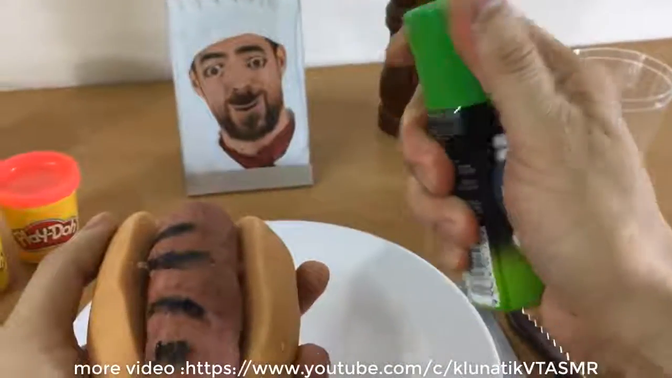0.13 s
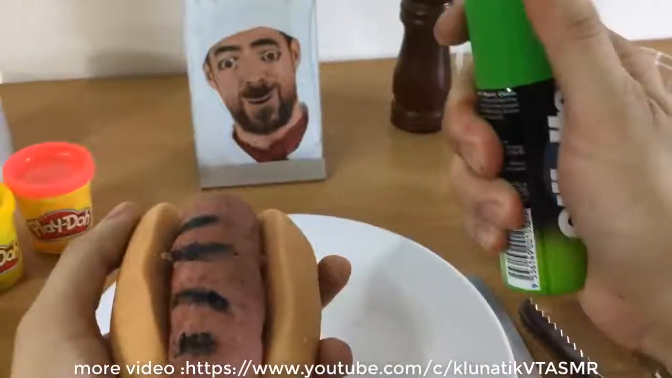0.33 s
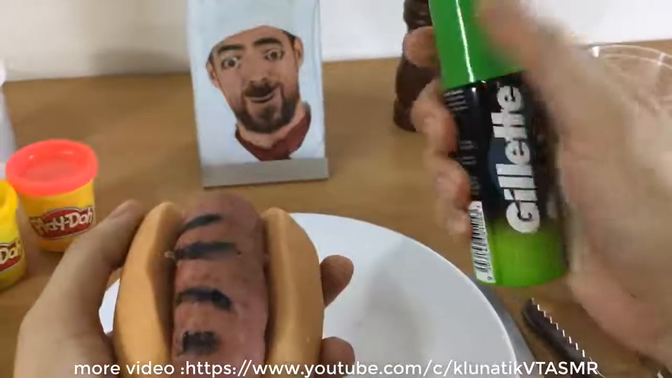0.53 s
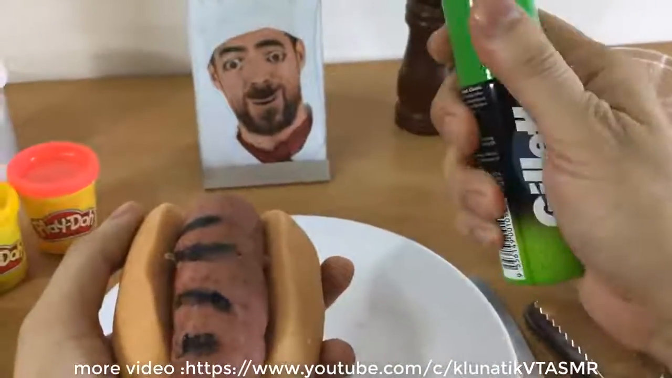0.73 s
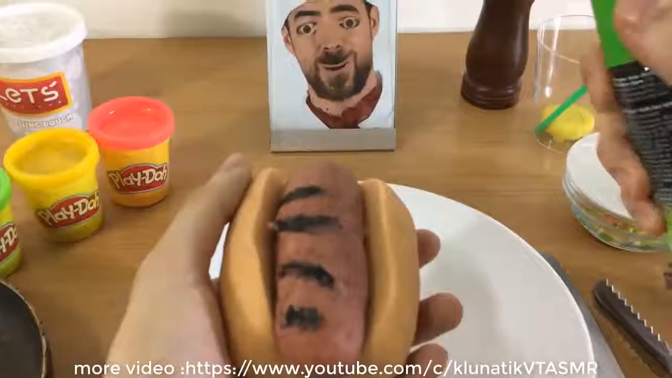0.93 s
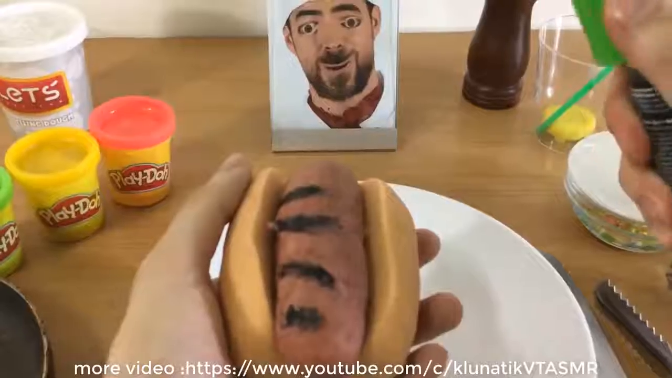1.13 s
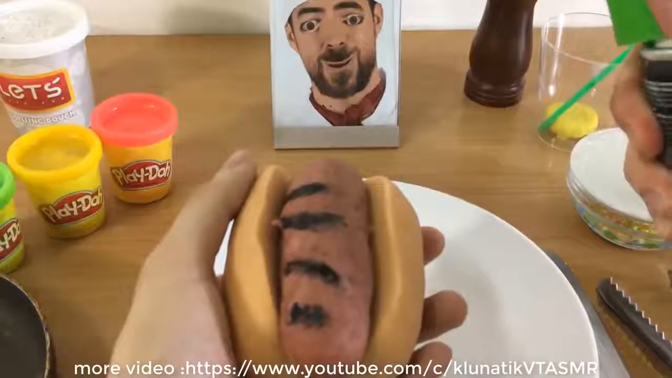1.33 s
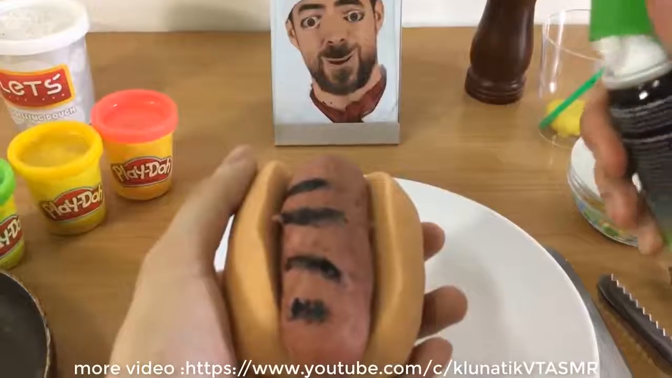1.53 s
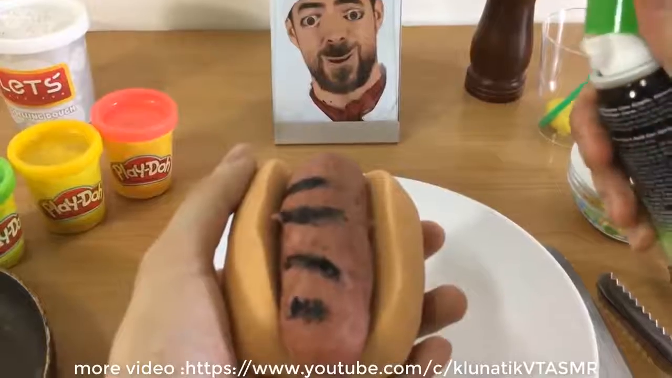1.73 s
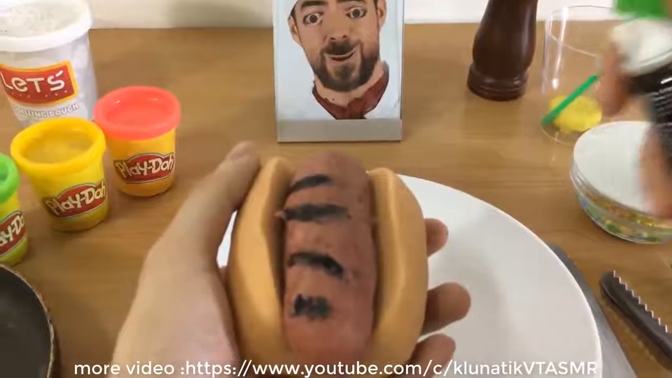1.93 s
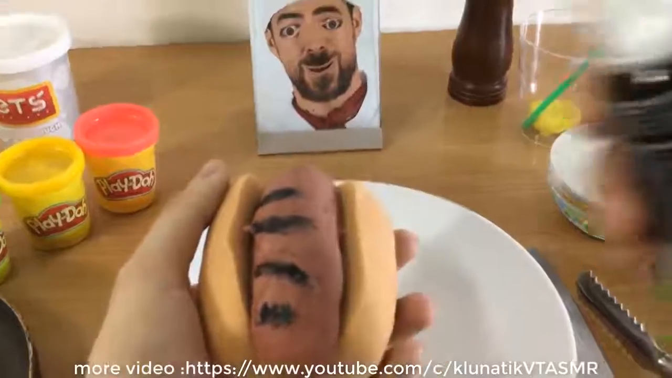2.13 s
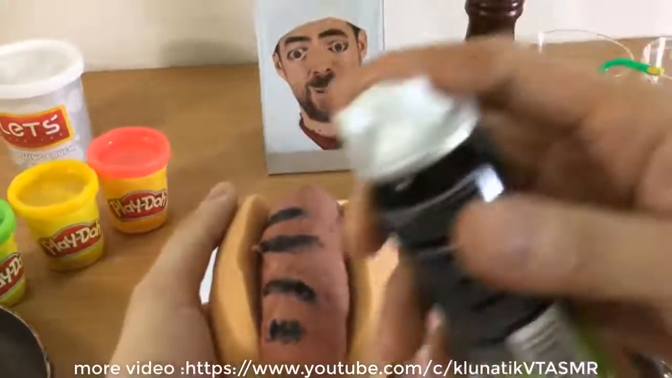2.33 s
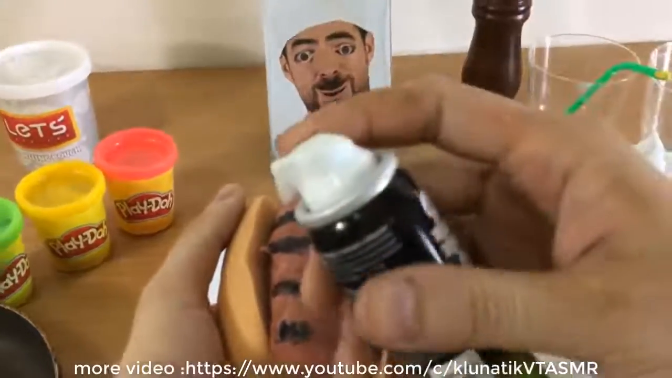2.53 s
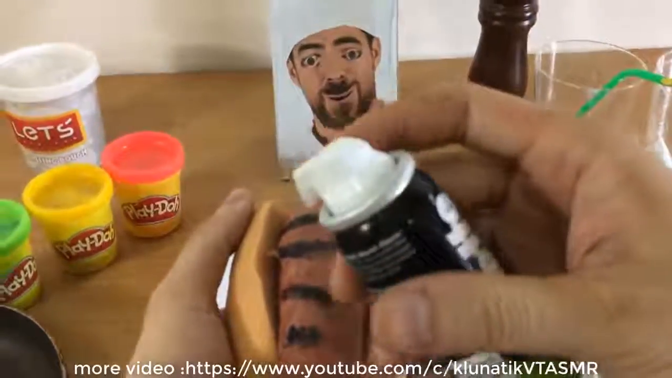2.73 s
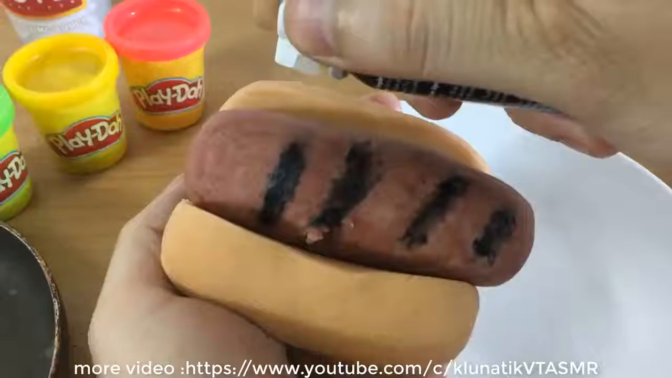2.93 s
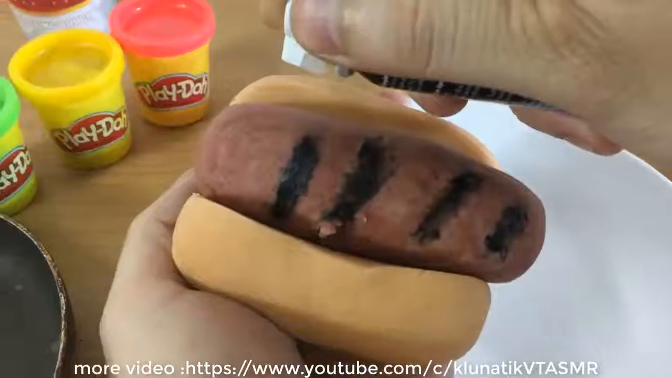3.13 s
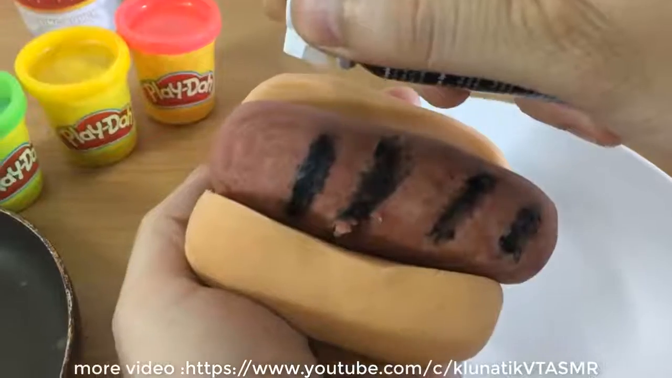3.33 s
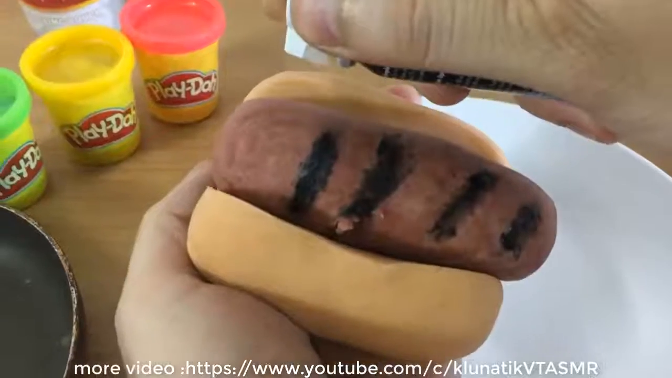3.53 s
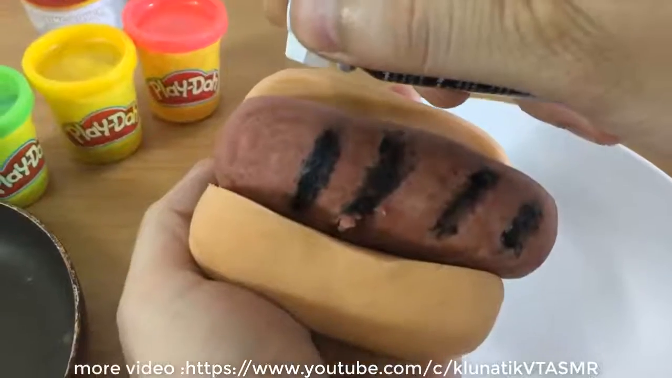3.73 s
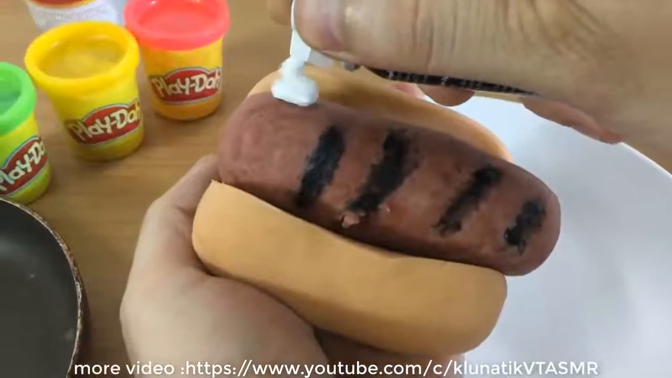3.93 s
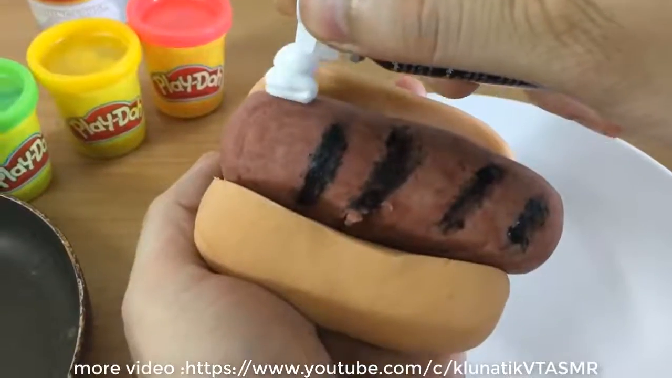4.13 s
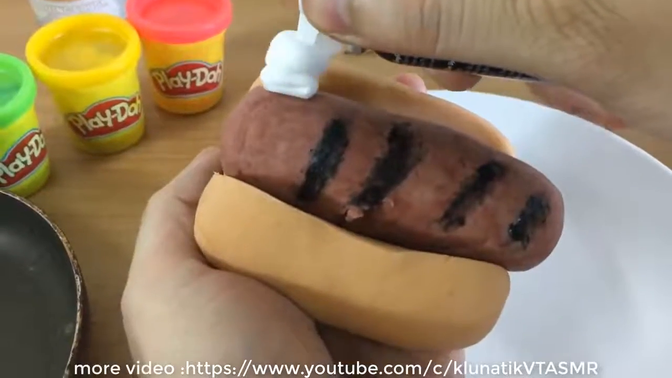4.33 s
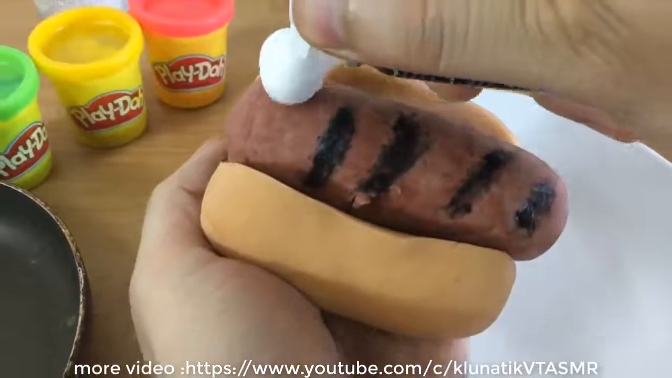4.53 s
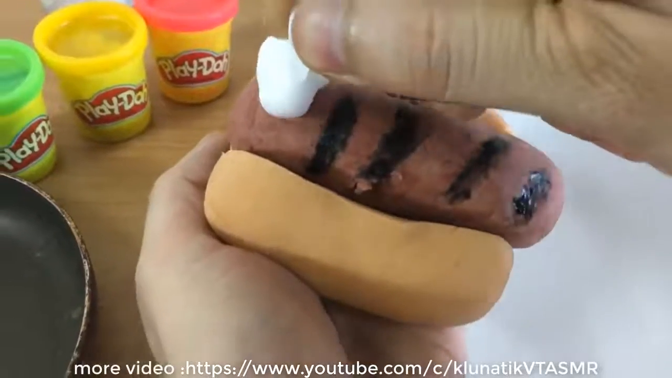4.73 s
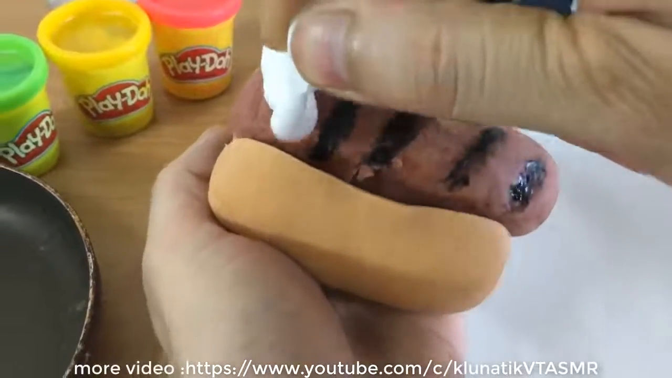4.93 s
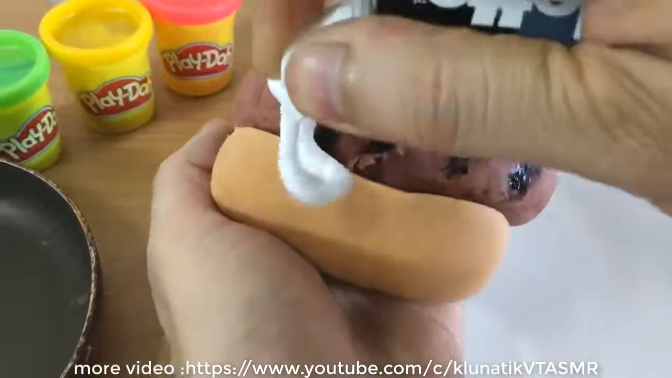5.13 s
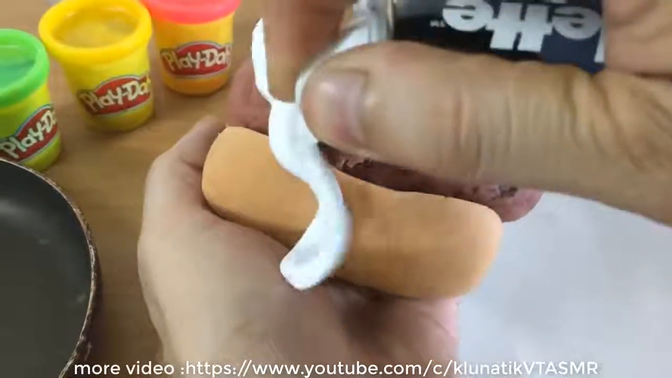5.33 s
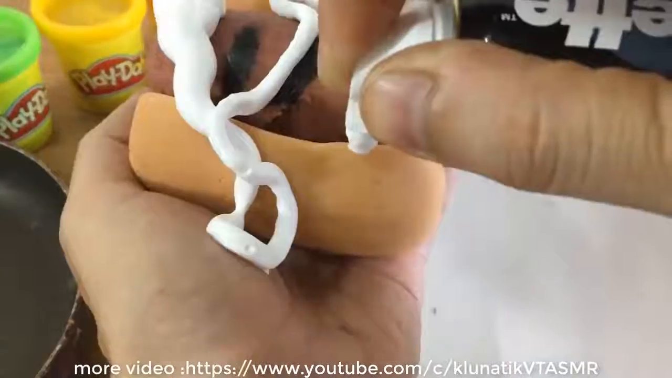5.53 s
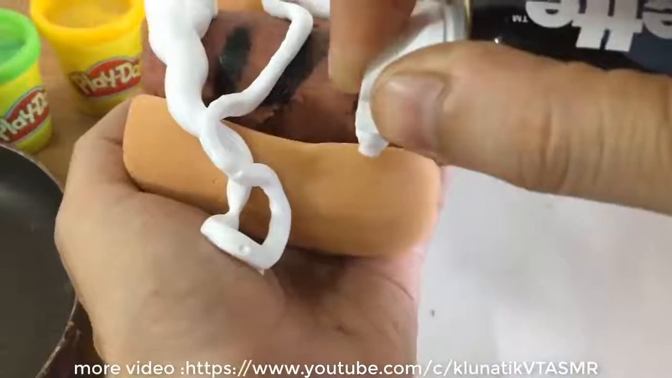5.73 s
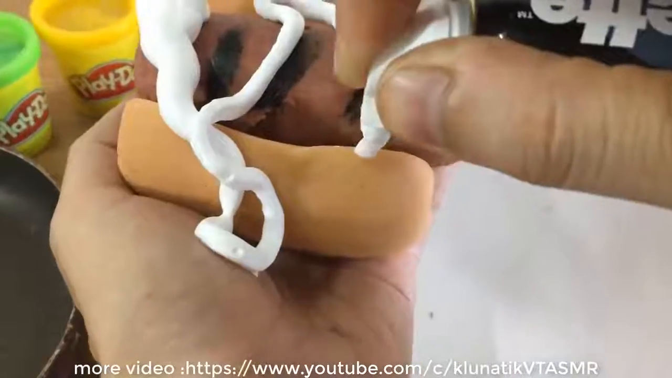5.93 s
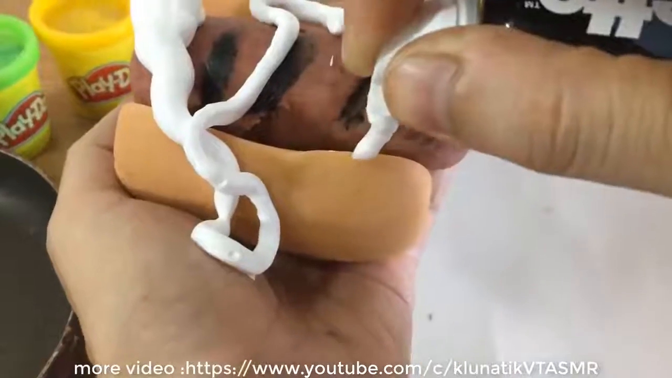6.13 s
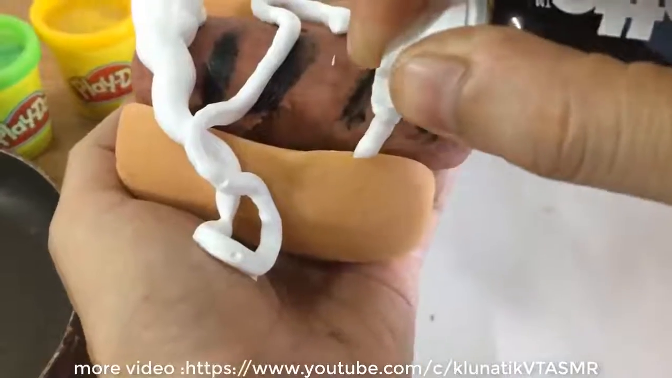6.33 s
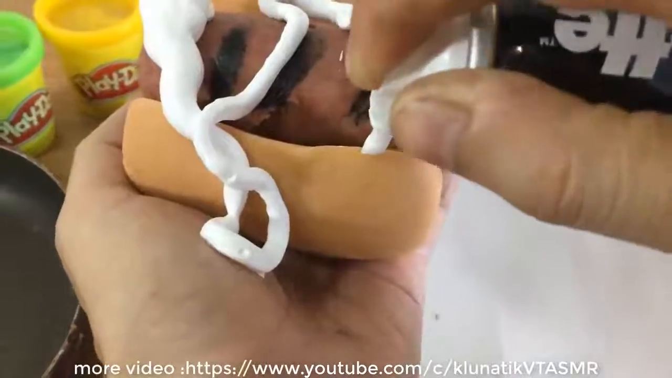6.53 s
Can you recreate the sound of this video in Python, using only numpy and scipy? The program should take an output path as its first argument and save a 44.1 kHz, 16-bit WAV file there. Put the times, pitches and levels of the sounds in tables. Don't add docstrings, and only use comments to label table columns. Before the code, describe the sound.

Close up in a quiet, bare-walled room, fingers creak and rub faintly on a metal can. A plastic cap cracks, then pops off very loudly with a hollow knock and brief echo. After a quiet pause of small handling ticks, a valve opens: thin gas hiss with spitting droplets and a few wet pops. The hiss swells, then is smothered into a dull, irregular gurgling crackle. Low room rumble sits underneath.

```python
import sys
import numpy as np
from scipy import signal
from scipy.fft import rfft, irfft, next_fast_len
from scipy.io import wavfile
from scipy.ndimage import map_coordinates

SR = 44100
rng = np.random.default_rng(int(sys.argv[2]) if len(sys.argv) > 2 else 0)


def boost(x):
    u = np.asarray(x, float) / 20
    return 10 ** u


def file_out(sig):
    cols = np.atleast_2d(sig).T
    lim = np.clip(cols, -1, 1)
    pcm = np.round(lim * 32767).astype(np.int16)
    wavfile.write(sys.argv[1], SR, pcm)


N = 290178
COVERED_S = 5.621


def unit(x):
    return x / np.sqrt(np.mean(x ** 2) + 1e-20)


def along(points, hz):
    f, value = np.transpose(points)
    return np.interp(np.log(hz + 1), np.log(f + 1), value)


def colour(points):
    return lambda hz: boost(along(points, hz))


def levels(rows):
    s, *columns = np.transpose(rows)
    t = np.arange(N) / SR
    return [boost(np.interp(t, s, db, -120, -120)) for db in columns]


def wobble(rate):
    knots = rng.standard_normal(int(N * rate / SR) + 4)
    return map_coordinates(knots, [np.arange(N) * rate / SR])


def resonances(modes, f):
    total = 0
    for k, (centre, width, db) in enumerate(modes):
        damping = 1j * f * width
        total = total + (-1) ** k * boost(db) * damping / (centre * centre - f * f + damping)
    return total


def filtered(x, response):
    n = x.shape[-1]
    m = next_fast_len(n + 2048)
    hz = np.fft.rfftfreq(m, 1 / SR)
    return irfft(rfft(x, m) * response(hz), m)[..., :n]


def spread(pair, alike):
    def mid_side_gains(hz):
        turn = np.arccos(np.clip(along(alike, hz), -1, 1)) / 2
        return np.array([np.cos(turn), np.sin(turn)])
    mid, side = filtered(pair, mid_side_gains)
    return np.array([mid + side, mid - side])


def rush(gain, alike, grain_db, rate):
    lumps = boost(grain_db * wobble(rate))
    noise = lumps * rng.standard_normal((2, N))
    return unit(filtered(spread(noise, alike), gain))


def panned(x, pan_db):
    return x * boost(np.array([[.5], [-.5]]) * pan_db)


def snaps(rows, body, ring_q, rise, differ, pan_db, kick, bubble_db):
    out, t = np.zeros((2, N + 2048)), np.arange(2048) / SR
    climb_s = 0.00597
    for s, db, hz, t60, ring_db in rows:
        draw = rng.standard_normal((4, len(t)))
        spikes = (draw[0] + differ * draw[1:3]) * np.exp(0.5 * draw[3])
        fade = boost(-60 * t / np.clip(t60, .003, .05)) * (1 - np.exp(-t / rise))
        burst = spikes * fade
        burst[:, 1 + round(rise * SR)] += kick
        ring = [(hz, hz / ring_q, 0)]
        sound = filtered(burst, lambda f: body(f) + boost(ring_db) * resonances(ring, f) ** 2)
        tone = np.sin(2 * np.pi * hz * t * (1 + t / climb_s / 2))
        bubble = boost(bubble_db + 2.7 * draw[3, 0]) * fade * tone
        peak = np.abs(sound.mean(0)).max()
        out[:, round(s * SR):][:, :len(t)] += boost(db) * (sound / peak + bubble)
    return panned(out[:, :N], pan_db)


# start_s, gas_flow_db, liquid_load_db in the stem
JET_FLOW = [(3.62, -73, -1), (3.702, -67, 3), (3.772, -61.5, 3), (3.862, -59.5, 4.5), (3.94, -55, 5.5),
            (4.04, -59, 6.5), (4.1, -63.5, 0), (4.332, -66.5, 1), (4.55, -65.5, -1), (4.766, -65.5, 0),
            (4.936, -62.5, -5), (5.2, -63.5, -4.5), (5.408, -52.5, -7.5), (5.488, -49.5, -6.5),
            (5.66, -50, -4.5)]
# peak_s, level_db, rise_db_per_s, fall_db_per_s
THROAT_CHOKES = [
    (4.045, -64, 118, 200),
    (5.619, -51, 76, 900),
]
# pitch_hz, level_db per Hz
THROAT_COLOUR = [(400, -120), (700, -4.5), (1000, 2.5), (1500, -8), (2100, -5.5), (3200, -120)]
# pitch_hz, level_db per Hz
STEM_COLOUR = [(1100, -120), (1700, -8), (2500, 3), (3050, -8), (4100, -11.5), (5000, -5), (6500, -7),
               (8000, -13), (10000, -120)]
# pitch_hz, width_hz, level_db
STEM_MODES = [(3000, 180, 6), (3950, 380, 7), (4980, 200, 3)]
# pitch_hz, level_db per Hz
FIZZ_COLOUR = [(3500, -120), (5500, -14.5), (7500, -4), (8800, -3), (11000, -4.5), (13000, -6.5),
               (15500, -18), (17000, -120)]
# pitch_hz, width_hz, level_db
NOZZLE_MODES = [(5150, 110, -2.5), (5900, 250, -0.5), (6960, 300, -4), (8480, 410, -2.5), (9860, 220, -2),
                (10970, 350, -4), (13000, 900, -14)]
# pitch_hz, likeness (-1 to 1)
NEAR_ALIKE = [(60, 0.15), (130, -0.017), (290, 0.63), (640, 1), (1410, 0.67), (3100, 0.84), (6820, -0.47),
              (15000, -0.1)]
# start_s, peak_db, pitch_hz
FIRST_DROPLETS = [(3.9973, -40, 5030), (4.0134, -33, 4430), (4.025, -38, 9700), (4.031, -33, 4740),
                  (4.742, -42, 9450)]
# start_s, peak_db, pitch_hz
DROPLETS = [(4.1387, -47, 9600), (4.1718, -52, 4630), (4.2069, -48, 9860), (4.2274, -47, 9840),
            (4.2625, -47, 9910), (4.2828, -46, 4690), (4.2907, -43, 4690), (4.3025, -44, 9500),
            (4.3119, -46, 8570), (4.3276, -47, 9880), (4.3366, -48, 5900), (4.3612, -49, 5120),
            (4.3845, -51, 9600), (4.4137, -32.5, 10140), (4.4375, -43, 9910), (4.4505, -47, 4930),
            (4.4686, -54, 4970), (4.4783, -54, 9600), (4.5093, -51, 5040), (4.5372, -36, 6100),
            (4.5608, -42, 4640), (4.5875, -42, 7110), (4.6078, -52, 9260), (4.6196, -53, 5960),
            (4.6526, -52, 9670), (4.6788, -40, 5000), (4.6927, -38, 9910), (4.7133, -35.5, 5980),
            (4.7374, -40, 9470), (4.7536, -43, 8180), (4.7617, -40, 6030), (4.7705, -45, 5150),
            (4.7948, -44, 9450), (4.8036, -38, 5170), (4.8339, -44, 5800), (4.8441, -33, 5900),
            (4.8741, -38, 7600), (4.8815, -42, 5170), (4.8877, -45, 5100), (4.9038, -36, 9350),
            (4.912, -42, 5250), (4.9231, -39, 5120), (4.94, -42, 4720), (4.9736, -40, 5100),
            (4.9849, -42, 5150), (4.9979, -37, 5200), (5.0098, -38, 4950), (5.0243, -36, 5100),
            (5.0467, -46, 4950), (5.0578, -45, 9910), (5.0963, -44, 5000), (5.1256, -34.5, 5180),
            (5.1442, -44, 5860), (5.2146, -43, 5900), (5.2208, -44, 6750), (5.2706, -45, 6560)]
# pitch_hz, level_db
SPLASH_COLOUR = [(3200, -60), (4600, -1), (9000, -3.5), (13500, -9), (15500, -22), (17000, -60)]


def jet():
    fizz, load = levels(JET_FLOW)
    t = np.arange(N) / SR
    fizz = fizz * (t < COVERED_S)
    flow = fizz / boost(-60)
    choke = 0
    for s, db, rise, fall in THROAT_CHOKES:
        choke = choke + boost(db - np.where(t < s, rise * (s - t), fall * (t - s)))
    throat = (fizz > 1e-5) * (choke + boost(-65) * flow ** 0.072)
    whistle = boost(-60) * flow ** 0.93

    nozzle = lambda f: resonances(NOZZLE_MODES, f)
    stem = lambda f: colour(STEM_COLOUR)(f) * (1 + np.abs(resonances(STEM_MODES, f)) ** 2)
    hiss = throat * rush(colour(THROAT_COLOUR), NEAR_ALIKE, grain_db=4.0, rate=56)
    hiss += fizz * load * rush(stem, NEAR_ALIKE, grain_db=1.2, rate=90)
    hiss += fizz * rush(colour(FIZZ_COLOUR), NEAR_ALIKE, grain_db=1.0, rate=150)
    hiss += whistle * rush(nozzle, NEAR_ALIKE, grain_db=3, rate=170)

    t60_s, ring_db, lead_s, trim_db = 0.013, 6.5, .0008, -1
    droplets = list(FIRST_DROPLETS) + list(DROPLETS)
    rows = [(s - lead_s, db + trim_db, hz, t60_s, ring_db) for s, db, hz in droplets]
    spray = lambda f: nozzle(f) + colour(SPLASH_COLOUR)(f)
    return hiss + snaps(rows, spray, ring_q=9.7, rise=0.0012, differ=1.0, pan_db=-5.5, kick=1.4,
                        bubble_db=-120)


# start_s, peak_db, pitch_hz, t60_s, ring_db
FOAM_POPS = [(3.996, -35.5, 3670, 0.054, 11), (4.014, -31.5, 4100, 0.02, 4), (4.039, -32, 1010, 0.021, 11),
             (4.048, -35, 1090, 0.013, 5), (4.058, -40, 1110, 0.014, 1), (4.398, -39, 1000, 0.012, 12),
             (4.7612, -33.5, 1250, 0.006, 11), (4.7616, -29, 2060, 0.0087, 10),
             (4.9045, -28, 1017, 0.068, 2), (4.9118, -17, 780, 0.0088, 4), (4.9128, -25.5, 2075, 0.034, 12),
             (6.0135, -26, 4650, 0.018, 11), (6.0215, -31.5, 2930, 0.012, -1),
             (6.157, -26.5, 4100, 0.015, 4), (6.2225, -23, 1470, .015, 2), (6.2483, -24, 3000, 0.027, -13),
             (5.121, -35.5, 2370, 0.065, 4.5)]
# start_s, peak_db, pitch_hz
BLANKET_BURSTS = [(5.6241, -29.5, 1400), (5.6483, -40, 5150), (5.6576, -48, 6420), (5.6712, -33, 2600),
                  (5.6963, -43, 5340), (5.7075, -29, 1790), (5.7209, -39, 2450), (5.7485, -31, 2400),
                  (5.7753, -19, 1506), (5.796, -39, 1520), (5.8116, -39, 2540), (5.8312, -38.5, 3660),
                  (5.858, -21, 1524), (5.8681, -30, 3340), (5.8892, -43, 3740), (5.8955, -38, 1320),
                  (5.9185, -31, 920), (5.9552, -36, 4350), (5.967, -37, 1170), (5.975, -36, 4300),
                  (5.9842, -37, 1770), (5.9915, -33.5, 3020), (6.017, -25.5, 2300), (6.0397, -27, 1550),
                  (6.0472, -35, 2970), (6.0705, -31, 1780), (6.0798, -47, 2200), (6.093, -27, 1490),
                  (6.11, -34, 1810), (6.117, -33, 3010), (6.1265, -34, 1380), (6.161, -22.5, 900),
                  (6.1706, -23, 3860), (6.1789, -30, 5240), (6.221, -16.5, 1760), (6.2306, -24, 3080),
                  (6.2372, -25.5, 2930), (6.2441, -18.5, 1510), (6.271, -30, 2050), (6.2812, -25, 1680),
                  (6.288, -30, 1160), (6.3041, -29, 2220), (6.313, -33, 2890), (6.318, -28, 1400),
                  (6.336, -34, 1280), (6.3575, -35, 3010), (6.3767, -29, 1500), (6.3808, -29, 1010),
                  (6.3888, -27, 1820), (6.4056, -29, 1810), (6.414, -24, 3000), (6.42, -19.5, 1520),
                  (6.4312, -22, 1690), (6.4592, -29, 3030), (6.4675, -21.5, 1330), (6.4843, -30, 910),
                  (6.497, -27, 2200), (6.5272, -23, 1370), (6.5588, -40, 1280), (6.566, -34, 1440)]
# start_s, gurgle_db
GURGLE = [(5.62, -52), (5.72, -49), (5.8, -46.5), (5.95, -47.5), (6.07, -39.5), (6.14, -45.5), (6.17, -36),
          (6.2, -39), (6.245, -32), (6.3, -47.5), (6.35, -41), (6.45, -37.5), (6.58, -50.5)]
# pitch_hz, level_db per Hz
FOAM_COLOUR = [(350, -31), (600, -18), (831, -7.5), (1170, -0.5), (1870, 1.5), (2830, -1), (3050, 3),
               (4040, -13.5), (5130, 1), (5720, -24), (7020, -4), (8000, -27), (10400, -55), (17600, -120)]


def foam():
    gurgle, = levels(GURGLE)
    clumps = boost(3.5 * wobble(45) - 7)
    bed = gurgle * clumps * rush(colour(FOAM_COLOUR), NEAR_ALIKE, grain_db=5, rate=700)

    since = np.arange(N) / SR - COVERED_S
    leak = (since > 0) * boost(-56 + 9.5 * np.exp(-np.abs(since) / 0.072))
    leak_modes = [(6380, 710, 8.1), (4500, 980, 6)]
    leak_colour = lambda f: colour(FIZZ_COLOUR)(f) + resonances(leak_modes, f)
    bed += leak * rush(leak_colour, NEAR_ALIKE, grain_db=3.0, rate=34)

    t60_s, ring_db, trim_db = 0.03, 1, -1
    rows = list(FOAM_POPS) + [(s, db + trim_db, hz, t60_s, ring_db) for s, db, hz in BLANKET_BURSTS]
    blanket_modes = [(900, 510, 2.5), (1850, 2400, 2), (2780, 2260, 3.5), (5000, 5400, -6.5)]
    bursts = snaps(rows, lambda f: resonances(blanket_modes, f), ring_q=2.53, rise=0.00015, differ=1.0,
                   pan_db=-5.0, kick=-24, bubble_db=-12)
    muffled = filtered(bursts, lambda f: 1 / (1 + 1j * f / 6800 / 0.83 - (f / 6800) ** 2) ** 3)
    return bed * boost([[-1.8], [1.8]]) + muffled


# start_s, crack_db, thump_db, lip_ring_db, left_right_db, missing_middle (share, 0-1)
CAP_BREAKS = [
    (1.241, -14, -32, -37, -3, .8),
    (1.241, -19.5, -7.5, 0, -2, 1),
    (1.3894, -33.5, -25.5, -16, 6.5, .1),
    (1.3909, -1.5, 6, 7.5, -6.5, 0),
    (1.3951, -17.5, -9.5, -1, 4, .1),
]
# pitch_hz, width_hz, level_db
CAP_CAVITY = [(110, 75, -18.5), (381, 174, 1), (455, 230, 2.5), (1000, 210, 1.5), (1800, 220, -8.5),
              (2720, 640, -4), (5210, 3200, -1.5), (7600, 3500, -2.5), (11400, 3900, -10)]
# pitch_hz, width_hz, level_db
RIM_DIP = (3200, 2400, 0)
# pitch_hz, level_db per Hz
CAP_TO_WALLS = [(70, -26.5), (130, -12), (170, -10), (213, -3.5), (340, -1.5), (374, -6.5), (477, -4),
                (681, -11.5), (836, -17.5), (1000, -8.5), (1250, -14), (1910, -17.5), (2990, -19.5),
                (5150, -23.5), (15000, -35)]


def cap():
    out, blows, t = np.zeros((2, N)), np.zeros(N), np.arange(1024) / SR
    for s, crack_db, thump_db, lip_db, pan_db, miss in CAP_BREAKS:
        draw = rng.standard_normal((3, len(t)))
        crack = (draw[0] + 0.61 * draw[1:]) * boost(crack_db - 60 * t / 0.021) * (1 - np.exp(-t / 0.001))
        crack = filtered(crack, lambda f: 1 - np.clip(miss, 0, 1) * resonances([RIM_DIP], f))
        u = np.clip(t - np.array([[0], [.0003]]), 0, 1) / 0.00034
        push = boost(thump_db) * u * np.exp(1 - u)
        lip = boost(lip_db - 60 * t / 0.003) * np.sin(2 * np.pi * 1800 * t) * (1 - np.exp(-t / 0.00032))
        start = round(s * SR)
        out[:, start:][:, :len(t)] += panned(crack + push + lip, pan_db)
        blows[start] = boost(21.5 + 1.205 * thump_db)
    direct = filtered(out, lambda f: resonances(CAP_CAVITY, f))
    return direct, filtered(blows, colour(CAP_TO_WALLS))


# start_s, peak_db, pitch_hz, t60_s, ring_db
CREAKS = [(.2473, -53, 4000, .01, 2), (.2608, -42.5, 2950, 0.015, 21), (.2724, -47, 4200, .01, -2),
          (.349, -49, 6000, 0.018, -13), (.3888, -54, 4000, 0.012, 9), (.4105, -40, 970, 0.011, 13),
          (.4107, -39.5, 493, 0.016, 21), (.4112, -33.5, 2780, 0.03, 13), (.8786, -44, 6000, 0.043, -15),
          (1.0614, -51, 6000, 0.0074, 1), (1.2116, -36.5, 11000, 0.017, -16), (1.8745, -49, 2500, .03, -1),
          (1.9045, -42, 1724, 0.06, 10), (2.1456, -47.5, 2400, 0.038, 1), (2.288, -56.5, 2200, .02, 16),
          (2.1744, -56, 4500, .012, -1), (2.9402, -58, 5000, 0.0054, -10), (2.77, -41.5, 200, 0.036, 44)]
# start_s, loudest_s, end_s, level_db
SKIN_STROKES = [(0.663, 0.76, 0.84, -67.5), (0.917, 1.076, 1.09, -65.5), (1.089, 1.122, 1.165, -57),
                (1.868, 1.882, 1.91, -52.5), (2.135, 2.164, 2.166, -63.5)]
# pitch_hz, width_hz, level_db
STROKE_RINGS = [(4130, 420, 0), (3300, 1800, 6), (4060, 500, 2), (2450, 930, 15), (4300, 700, -1)]
# pitch_hz, level_db per Hz
SKIN_COLOUR = [(1180, -35), (2000, -10.5), (4160, -5.5), (13100, -8.5), (13900, -14.5), (14300, -66.5),
               (15000, -21)]


def hand():
    skin = rush(colour(SKIN_COLOUR), NEAR_ALIKE, grain_db=2.0, rate=160)
    rub = np.zeros((2, N))
    for (start, loudest, end, db), ring in zip(SKIN_STROKES, STROKE_RINGS):
        quiet_db, ring_db = db - 12.5, ring[2]
        stroke, = levels([(start, quiet_db), (loudest, db), (end, quiet_db)])
        body = lambda f: boost(5.0) * (1 + resonances([ring], f) ** 2 / boost(ring_db))
        rub += filtered(stroke * skin, body) * boost(-.6 * ring_db)

    shell = lambda f: resonances([(700, 280, -13.5), (5430, 4100, -19.5)], f)
    creaks = snaps(CREAKS, shell, ring_q=3.15, rise=0.00037, differ=0.34, pan_db=-9.5, kick=6.5,
                   bubble_db=-120)
    return creaks + rub * boost([[-1.5], [1.5]])


# pitch_hz, t60_s
WALL_DECAY = [(100, 0.59), (300, 0.68), (1200, 0.86), (3000, 0.72), (6000, 0.69), (12000, 0.46)]
# pitch_hz, likeness (-1 to 1)
WALL_ALIKE = [(60, -0.27), (240, 0.65), (950, 0.72), (3770, 0.55), (15000, 0.13)]


def room(x):
    hz, t, z = signal.stft(rng.standard_normal((2, SR)), SR, nperseg=256)
    fade = boost(-60 * t / along(WALL_DECAY, hz)[:, None])
    tail = spread(signal.istft(z * fade, SR, nperseg=256)[1], WALL_ALIKE)
    late = np.pad(x, (260, 0))[None]
    return signal.fftconvolve(late, tail / np.linalg.norm(tail[0]), axes=1)[:, :N]


# pitch_hz, level_db per Hz
TONE_COLOUR = [(32, -27.5), (55, -1), (76, -2), (171, -5.5), (205, -2), (232, -11), (263, -9), (351, -14.5),
               (432, -17), (469, -16), (1500, -27.5), (1950, -44.5), (3300, -120)]
# pitch_hz, likeness (-1 to 1)
TONE_ALIKE = [(60, -0.7), (130, 0.24), (290, 0.65), (640, 0.47), (1410, 0.73), (3100, 0.335), (6820, 0.194),
              (15000, 0.08)]
# pitch_hz, level_db per Hz
HISS_COLOUR = [(710, -16.5), (1200, -14), (2400, -15), (2860, -16.5), (3030, -19), (3240, -19.5),
               (5610, -25), (12000, -27.5), (15600, -38.5), (22000, -120)]


def air():
    swell_s, width_s = 4.36, 0.56
    swell_db = 8.5 * np.exp(-((np.arange(N) / SR - swell_s) / width_s) ** 2)
    rumble = boost(-52.5 + swell_db + 0.5 * wobble(2.5))
    low = rush(lambda f: resonances([(44.0, 24, 0)], f) ** 2, [(40, 0.29)], grain_db=-1.5, rate=12)
    tone = boost(-47.5) * rush(colour(TONE_COLOUR), TONE_ALIKE, grain_db=0.4, rate=5.1)
    hiss = boost([[-65], [-67]]) * rush(colour(HISS_COLOUR), TONE_ALIKE, grain_db=0.1, rate=7.4)
    return rumble * low * boost([[1.5], [-1.5]]) + tone * boost([[1.2], [-1.2]]) + hiss


def scene():
    gas, froth, (lid, lid_to_walls), grip = jet(), foam(), cap(), hand()
    dull_gas = filtered(gas, lambda f: 1 / (1 + (f / 6000) ** 4))
    echo = room(boost(-5.5) * grip.mean(0) + lid_to_walls)
    echo += room((boost(-8.0) * dull_gas + boost(-7.5) * froth).mean(0))
    lag = lambda f: np.exp(-2j * np.pi * f * np.array([[0], [.00004]]))
    return grip + lid + filtered(gas + froth, lag) + echo + air()


def top_cut(x):
    return signal.sosfilt(signal.butter(12, 16550, fs=SR, output="sos"), x)


# pitch_hz, level_db
MIC_COLOUR = [(9000, 1.5), (11500, 1.5), (13000, -1), (14500, 3), (15800, -15), (16400, -59.5)]


def record(dry):
    soft = dry / (1 + np.abs(dry / .8) ** 4) ** (1 / 4)
    mix = filtered(soft, colour(MIC_COLOUR))
    return top_cut(mix)


dry = scene()
out = record(dry)
file_out(out)
```